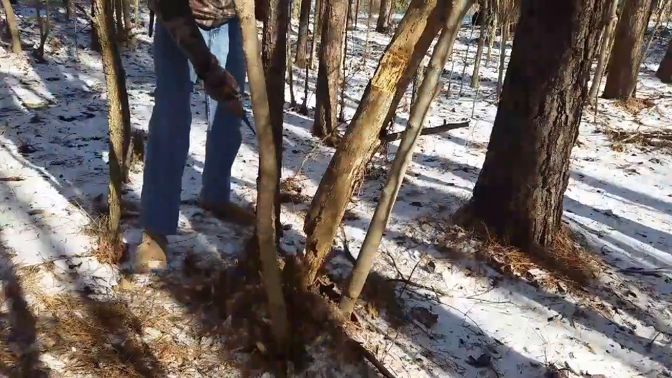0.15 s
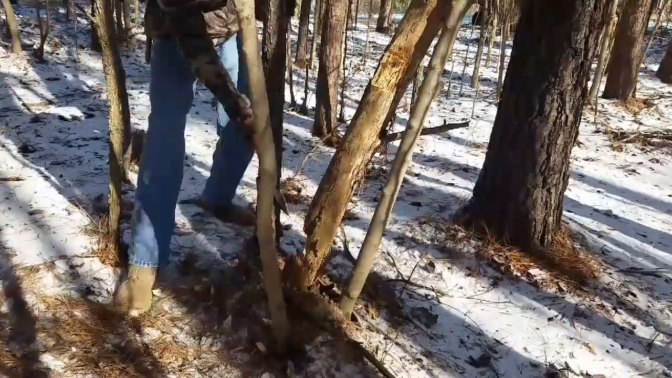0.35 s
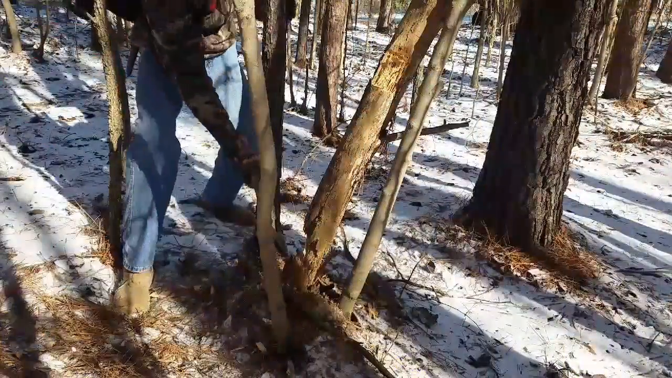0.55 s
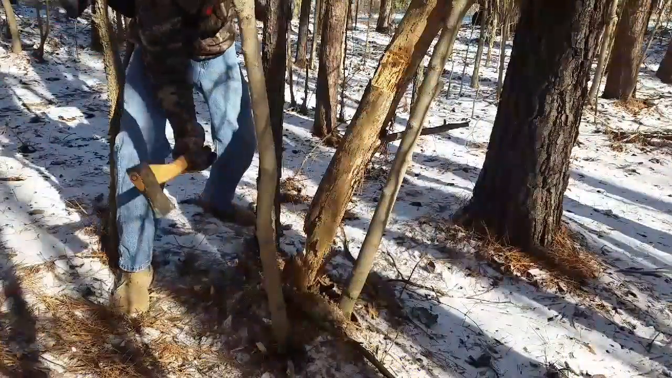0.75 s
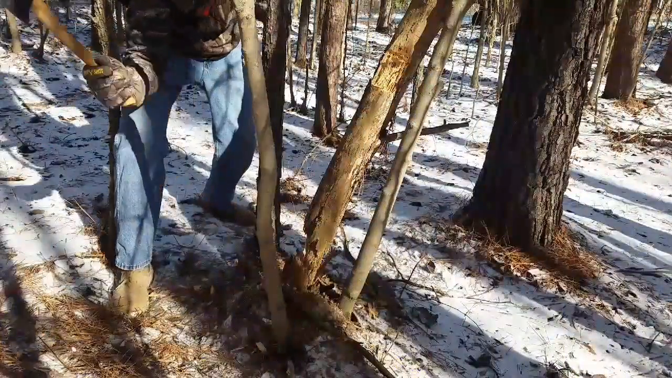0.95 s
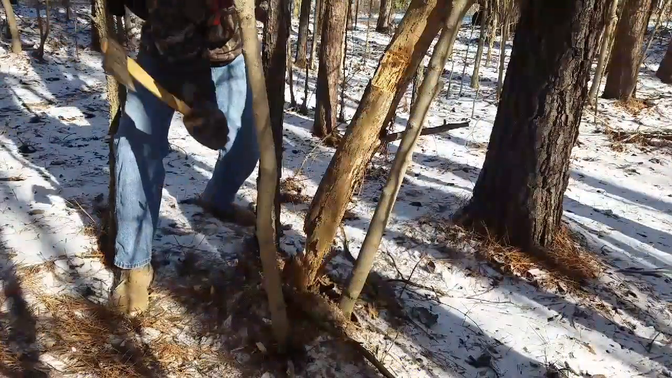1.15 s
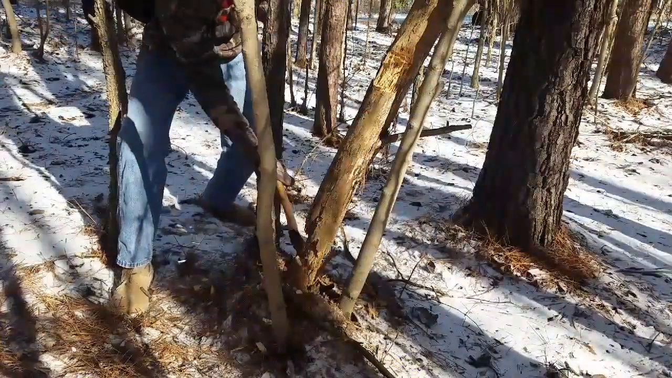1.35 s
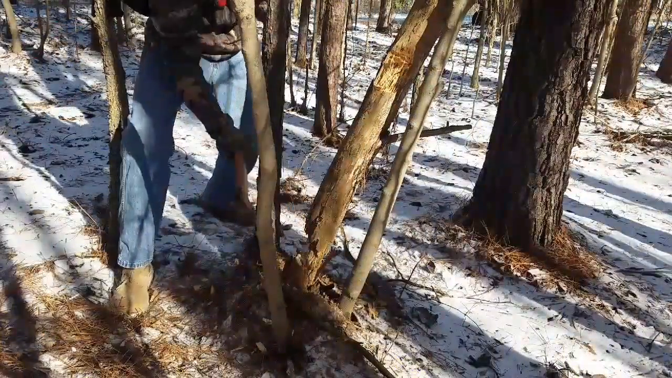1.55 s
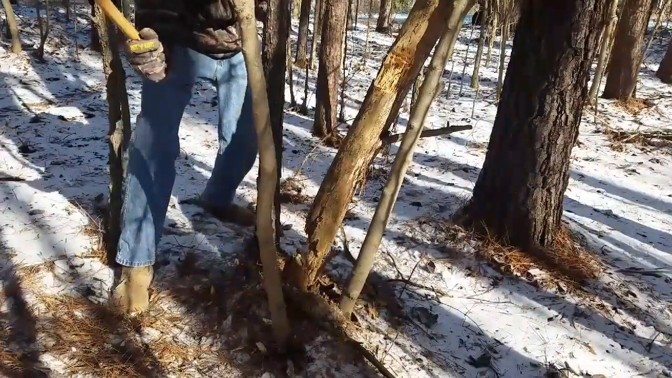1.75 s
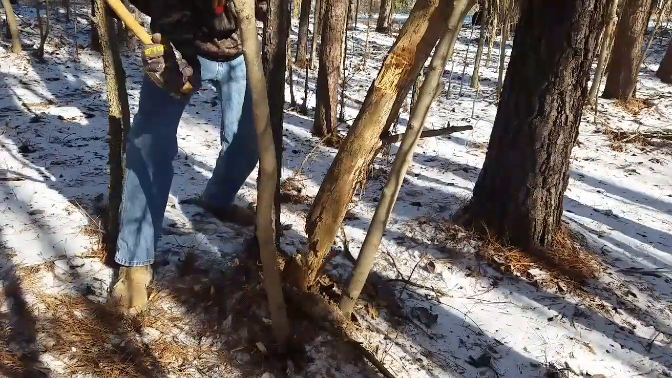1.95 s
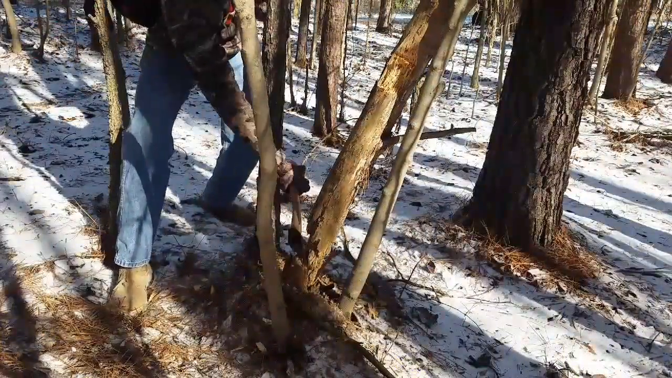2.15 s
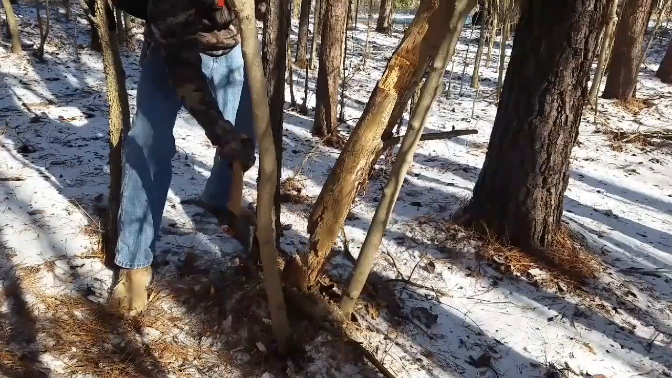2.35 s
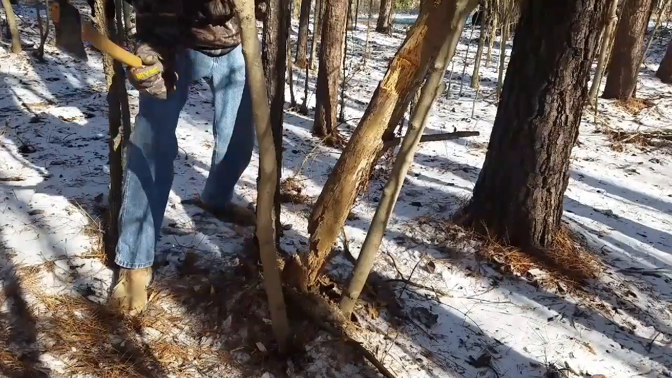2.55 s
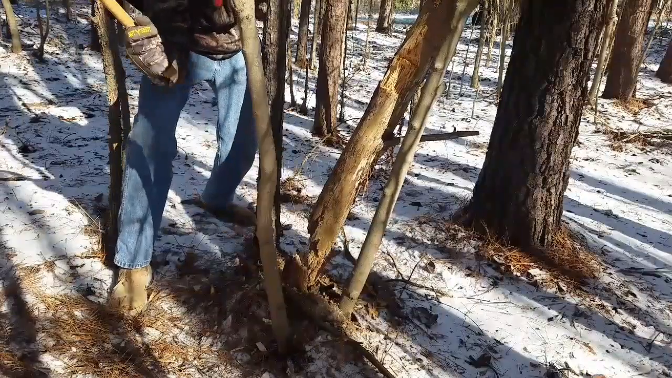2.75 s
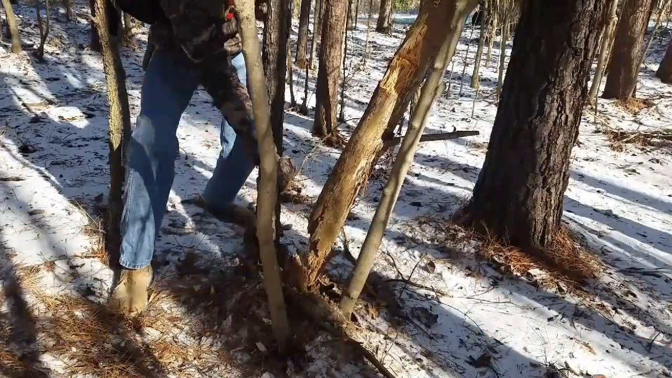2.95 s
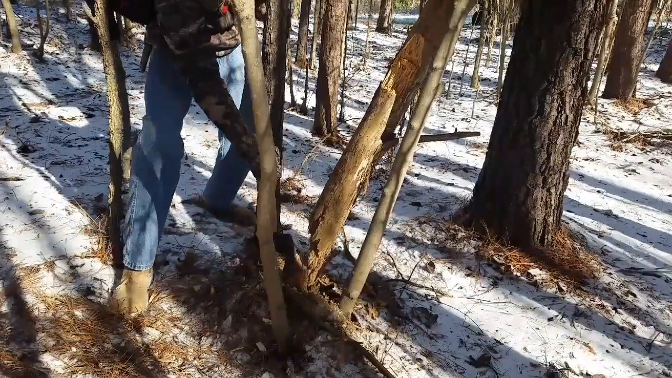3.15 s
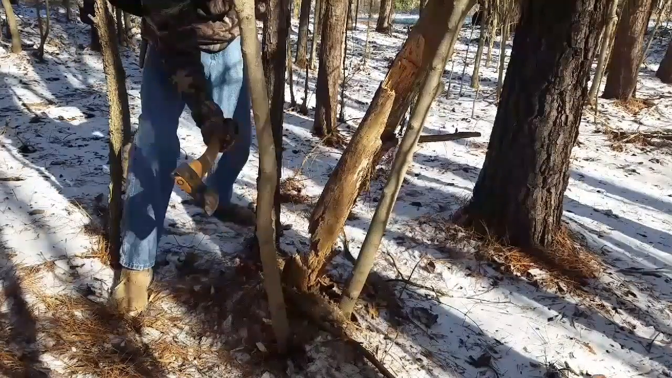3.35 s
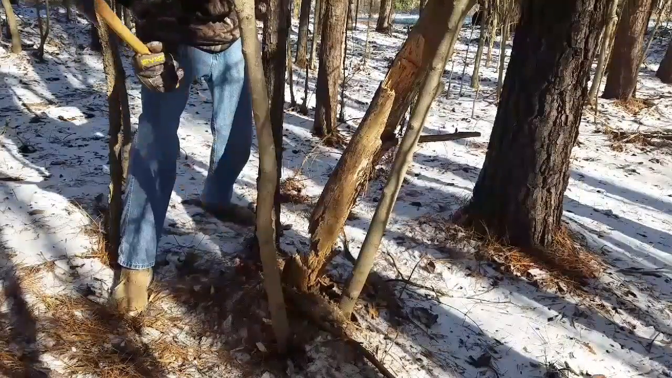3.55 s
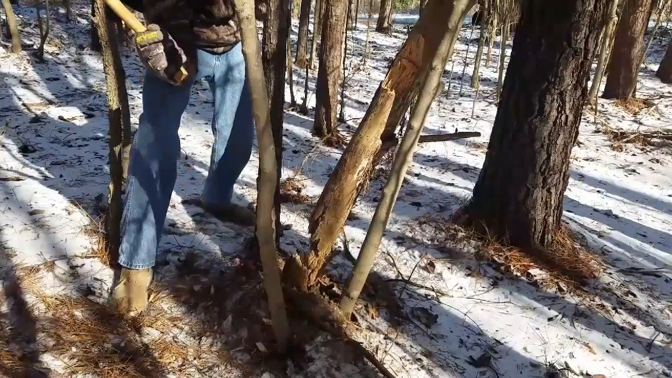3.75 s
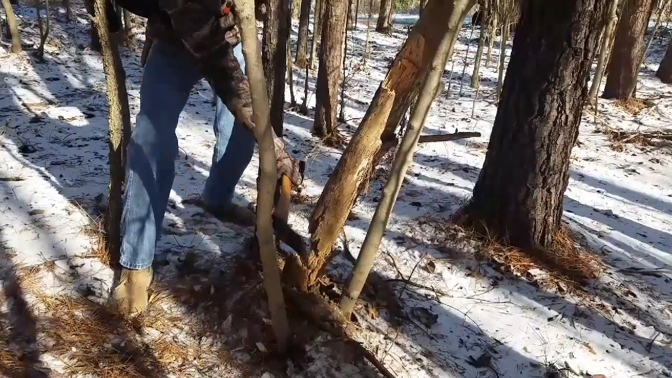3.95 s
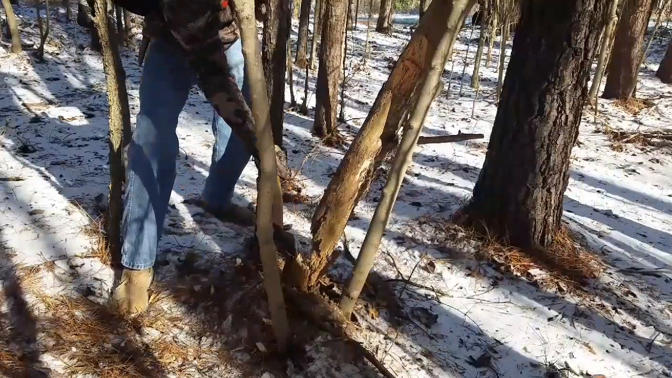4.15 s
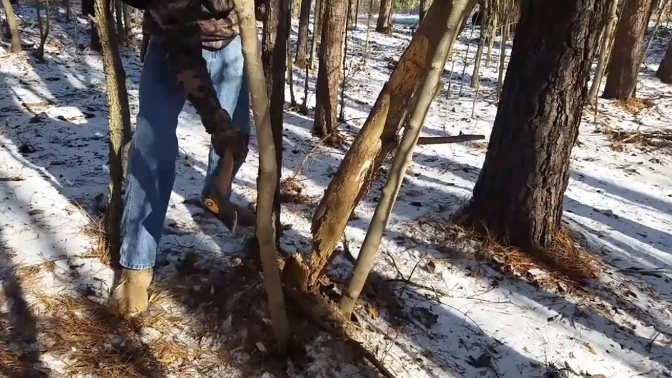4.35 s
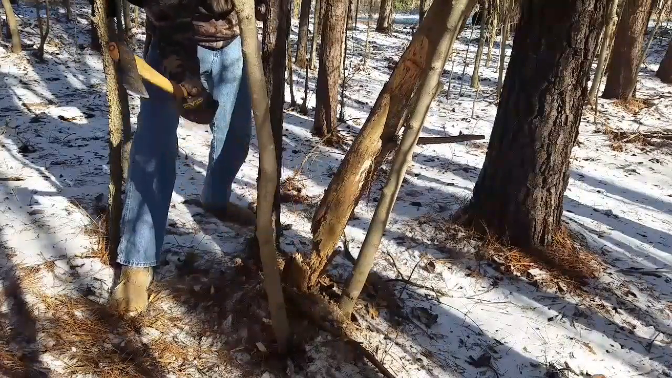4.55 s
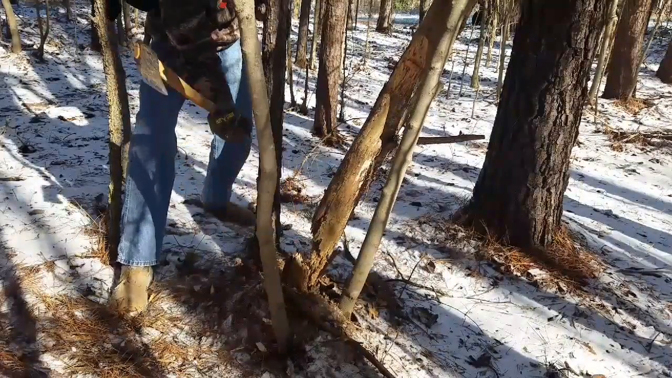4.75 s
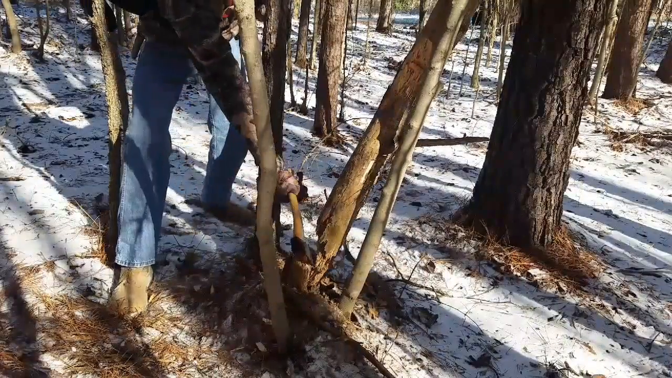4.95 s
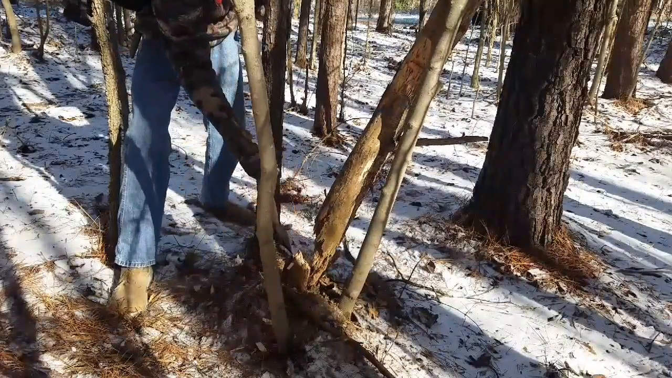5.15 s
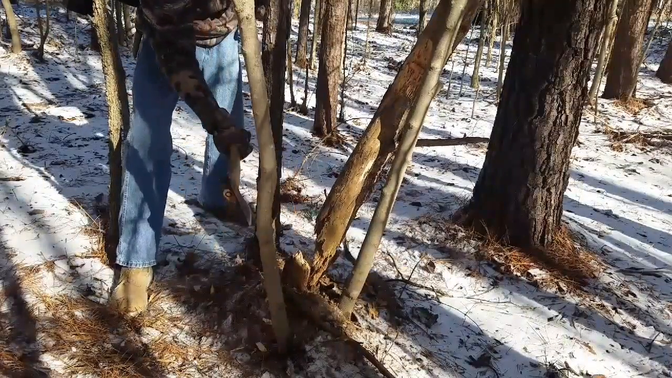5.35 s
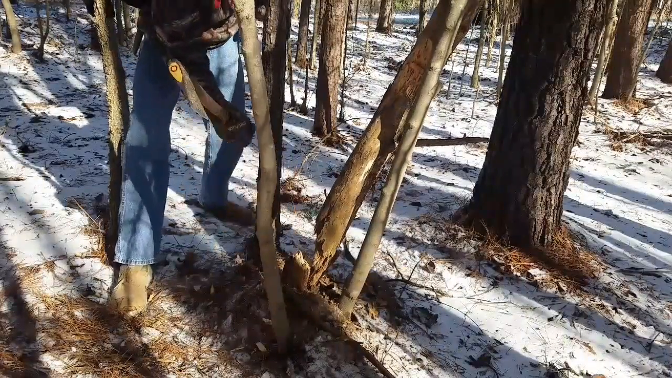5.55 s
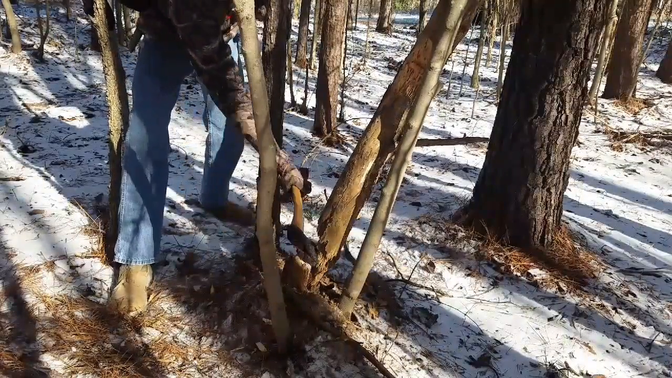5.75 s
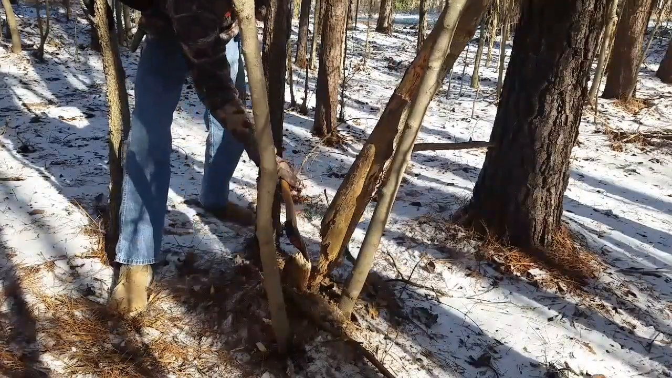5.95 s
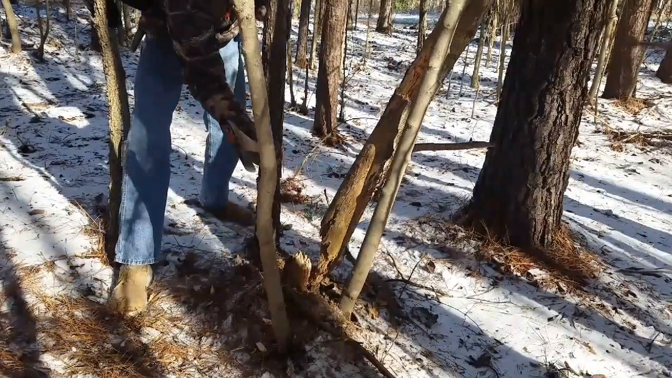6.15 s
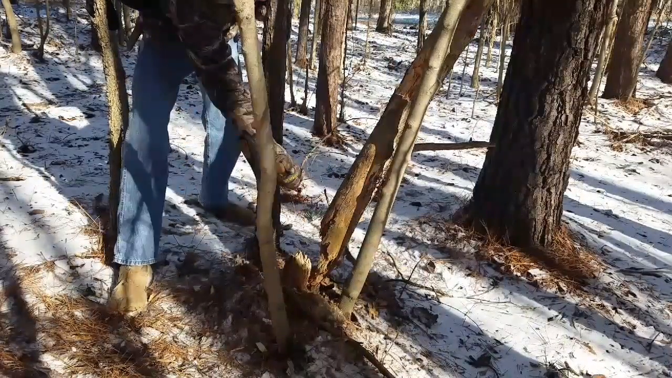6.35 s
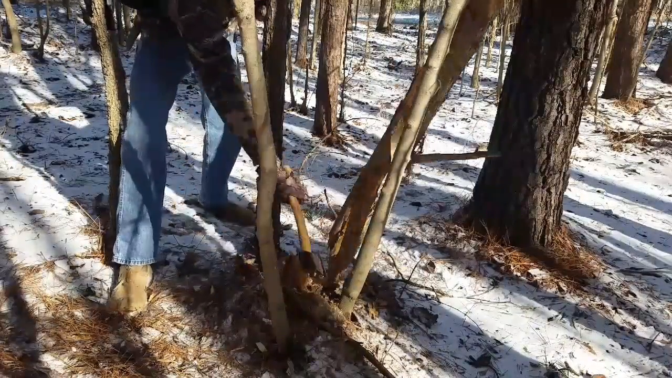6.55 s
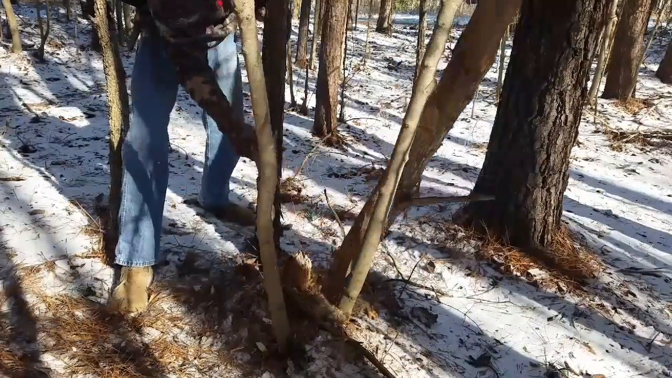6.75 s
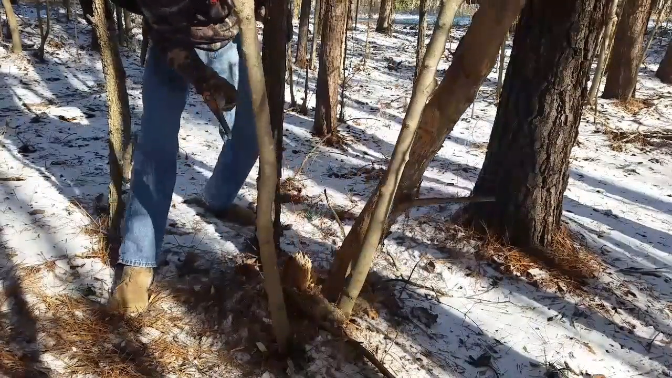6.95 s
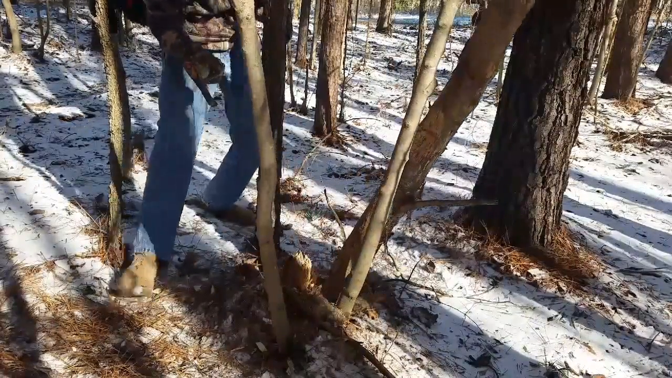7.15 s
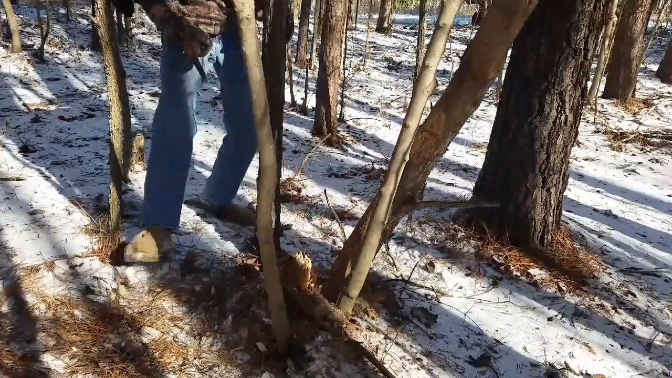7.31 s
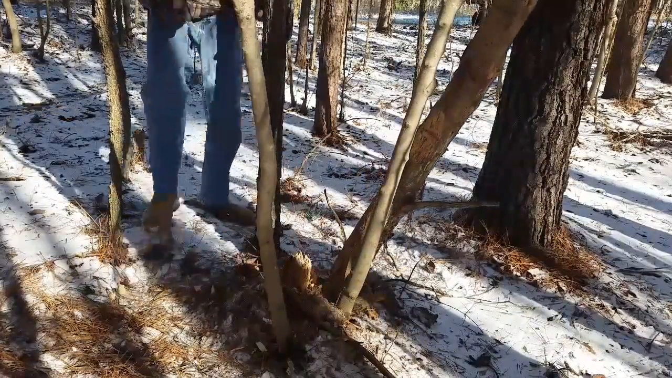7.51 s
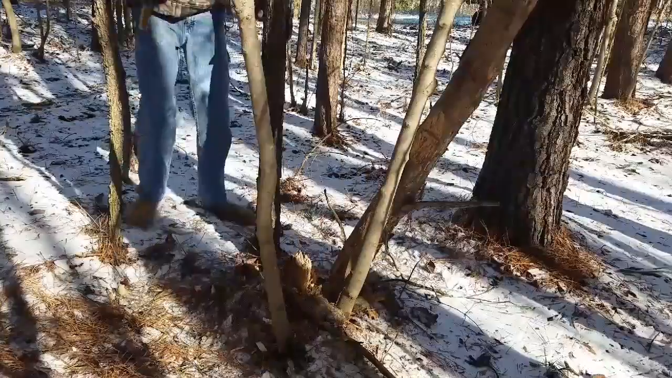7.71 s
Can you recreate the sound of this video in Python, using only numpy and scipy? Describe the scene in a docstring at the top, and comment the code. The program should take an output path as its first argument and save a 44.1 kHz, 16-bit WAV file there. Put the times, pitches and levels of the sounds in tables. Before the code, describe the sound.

Quiet snowy forest, close outdoor stereo pickup. Faint scuffs and twig ticks lead to seven loud, dry hatchet blows, each slightly different in pitch and brightness. The blade knocks briefly as it is prised free after the third. The final chop runs straight into several sharp fibre cracks as the trunk gives way; a dull bump, litter rustle and soft boot scuffs follow. Echoes scatter off trees.

```python
"""Felling a dead pine

In snowy woods a hatchet strikes seven times, then the stem breaks in a run of dry cracks.
Each chop is three impacts (edge bites, wedge jams, head rocks) that excite decaying modes of the trunk
and its notch, tear fibres as showers of clicks, and shake the ground as a low damped swell.
Boots, twigs and bumps are filtered grains; the trees scatter the wood, boots and ground into a long tail."""
import sys
import numpy as np
from scipy import signal
from scipy.fft import rfft, irfft, next_fast_len
from scipy.io import wavfile

SR = 44100
rng = np.random.default_rng(int(sys.argv[2]) if len(sys.argv) > 2 else 0)


def transcribe(signal):
    """Save signal, clipped to [-1, 1], as a 16-bit WAV file at the path in sys.argv[1]."""
    frames = np.atleast_2d(signal).T
    limited = np.clip(frames, -1, 1)
    pcm = np.round(limited * 32767).astype(np.int16)
    wavfile.write(sys.argv[1], SR, pcm)


N = 343098


def from_db(db):
    """Decibel law: a level in dB becomes an amplitude ratio."""
    return 10 ** (np.asarray(db) / 20)


def rms_one(x):
    """Power normalisation: the mean square becomes one."""
    return x / np.sqrt(np.mean(x ** 2) + 1e-20)


def unit_energy(x):
    """Energy normalisation: the squares of each channel sum to one."""
    return x / np.sqrt(np.sum(x ** 2, axis=-1, keepdims=True) + 1e-20)


def seconds(length):
    """Sampled time, from zero up to the length in seconds."""
    return np.arange(int(length * SR)) / SR


def fade(t, t60):
    """Exponential decay by 60 dB in t60 seconds."""
    return np.exp(-np.log(1000) * t / t60)


def add(out, start, sound):
    """Superposition: a sound is summed in from its start in seconds."""
    i = max(round(start * SR), 0)
    out[:, i:i + sound.shape[-1]] += sound[..., :N - i]


def colour(x, points):
    """Minimum-phase filtering: a causal response through (Hz, dB) points, by folding the cepstrum."""
    n = 2 * next_fast_len(x.shape[-1] // 2 + 1024)
    hz, db = np.transpose(points)
    bin_hz = np.arange(n // 2 + 1) * SR / n
    gain_db = np.interp(np.log(bin_hz + 1), np.log(hz), db)
    cepstrum = irfft(np.log(from_db(gain_db)))
    cepstrum[1:n // 2] *= 2
    cepstrum[n // 2 + 1:] = 0
    return irfft(rfft(x, n) * np.exp(rfft(cepstrum)))[..., :x.shape[-1]]


def grains(n, spread_db):
    """Granular noise: two unrelated streams of tiny clicks of uneven size."""
    size_db = spread_db * np.minimum(rng.exponential(1, (2, n)), 5)
    return rms_one(rng.standard_normal((2, n)) * from_db(size_db))


# Share of sound that differs between the ears. Each row: frequency in Hz, side gain in dB.
EAR_DIFFERENCE = [(100, -5), (300, -9), (650, -6), (1400, 0.5), (4000, 0), (14000, 0.5)]


def diffuse(pair):
    """Interaural coherence: the ears hear alike in the bass and differently in the treble."""
    side = colour(pair[1], EAR_DIFFERENCE)
    return rms_one(np.array([pair[0] + side, pair[0] - side]))


# Grainy crunch of packing snow. Each row: frequency in Hz, filter gain in dB.
CRUNCH_SPECTRUM = [(80, -8.5), (200, -0.5), (400, -0.5), (900, -3), (1800, -4.5), (3000, -16.5),
                   (8000, -40)]
# Hiss of snow crust and cloth. Each row: frequency in Hz, filter gain in dB.
HISS_SPECTRUM = [(800, -7.5), (2500, -1), (4500, 1), (7500, 2), (9500, -9), (14000, -4.5)]
# Boots scuff and clothes brush. Each row: start in seconds, length in seconds,
# crunch level in dB, hiss level in dB.
SCUFFS = [(-.02, 0.077, -52.5, -48.5), (0.25, 0.078, -49, -41), (0.305, 0.2, -49, -45),
          (0.514, 0.23, -58.5, -56.5), (0.781, 0.16, -57.5, -64), (0.828, 0.055, -51, -55),
          (1.815, 0.26, -64, -63), (5.758, 0.064, -52, -66), (5.813, 0.041, -60, -48),
          (7.361, 0.18, -59, -52), (7.755, .06, -48, -47.5)]


def boots(edge_s, left_db):
    """Granular friction: snow packs with a sparse crunch while its crust and the cloth hiss."""
    out, t = np.zeros((2, N)), np.arange(N) / SR
    slips = np.interp(t, np.linspace(0, N / SR, 550), rng.standard_normal(550))
    surge = from_db(2.0 * slips)
    sparse = grains(N, spread_db=2.5) * (rng.random(N) < .03)
    crunch = rms_one(colour(diffuse(sparse), CRUNCH_SPECTRUM) * surge)
    hiss = rms_one(colour(diffuse(grains(N, spread_db=4.0)), HISS_SPECTRUM) * surge)
    hiss = hiss * from_db([[left_db], [-left_db]])
    for start, length, crunch_db, hiss_db in SCUFFS:
        press = np.clip((t - start) / edge_s, 0, 1)
        release = np.exp(-np.clip((t - start - length) / edge_s + 1, 0, 20))
        out += press * release * (from_db(crunch_db) * crunch + from_db(hiss_db) * hiss)
    return out


# Effort of the shifting stance, joined by straight lines. Each row: time in seconds, level in dB.
STANCE = [(0, -59), (1.1, -67), (2.0, -62), (2.9, -59.5), (3.8, -65.5), (4.7, -74), (5.35, -54),
          (5.7, -59.5), (6.45, -56), (7.2, -52), (7.75, -65.5)]
# Colour of needles and twigs. Each row: frequency in Hz, filter gain in dB.
LITTER_SPECTRUM = [(100, -15), (350, 5.5), (900, -0.5), (2500, -5.5), (7500, -5.5), (9500, -12),
                   (14000, -7)]
TWIGS_PER_S, TWIG_SPREAD_DB = 55, 2.5
RUSTLE_DB = 2.0   # even rustle relative to the ticks


def litter(tick_t60):
    """Random impulses: tiny twigs tick over rustling needles as the weight moves from boot to boot."""
    sizes = rng.standard_normal(N) * from_db(TWIG_SPREAD_DB * np.minimum(rng.exponential(1, N), 3))
    clicks = sizes * (rng.random(N) < TWIGS_PER_S / SR)
    t = seconds(.03)
    tick = diffuse(grains(len(t), spread_db=6.0)) * fade(t, tick_t60)
    ticks = rms_one(signal.fftconvolve(clicks[None], tick, axes=-1)[:, :N])
    rustle = diffuse(grains(N, spread_db=-1.5))
    effort = from_db(np.interp(np.arange(N) / SR, *np.transpose(STANCE)))
    return effort * rms_one(colour(ticks + from_db(RUSTLE_DB) * rustle, LITTER_SPECTRUM))


# Colour of the still winter air. Each row: frequency in Hz, filter gain in dB.
AIR_SPECTRUM = [(25, -4), (80, -4), (150, -11), (400, -4), (900, -12), (2500, -20.5), (7500, -26),
                (9500, -29.5), (14000, -23)]


def winter_air(level_db):
    """Stationary noise: a steady, diffuse background with a falling spectrum."""
    noise = diffuse(rng.standard_normal((2, N)))
    return from_db(level_db) * rms_one(colour(noise, AIR_SPECTRUM))


# Early scattering by ground and nearby stems. Each row: frequency in Hz, gain in dB.
NEAR_SCATTER = [(100, -10), (400, -5), (1200, -9.5), (3000, -7.5), (8000, -4), (14000, -2)]
# Late scattering by farther trunks. Each row: frequency in Hz, gain in dB.
FAR_SCATTER = [(70, -10.5), (200, -22.5), (500, -15.5), (1000, -14.5), (2500, -12), (7000, -9.5),
               (14000, -7.5)]


def forest(x, near_t60, far_t60, treble_t60, deep_t60, deep_db, low_patchy_db, high_patchy_db):
    """Multiple scattering: near stems answer at once; farther echoes add in power to a grainy tail."""
    t = seconds(.25)
    near_rise = 1 - np.exp(-t / 0.00027)
    near = unit_energy(diffuse(grains(len(t), spread_db=4.5)) * fade(t, near_t60) * near_rise)
    out = signal.fftconvolve(x, colour(near, NEAR_SCATTER), axes=-1)[:, :N]
    t, edges = seconds(2), np.geomspace(60, 15000, 13)
    far_rise = 1 - np.exp(-t / 0.0092)
    echoes = [diffuse(grains(N, spread_db=3.5)) for _ in range(2)]   # alternate between bands
    far_hz, far_db = np.transpose(FAR_SCATTER)
    for k, band in enumerate(zip(edges, edges[1:])):
        sos = signal.butter(2, band, "band", fs=SR, output="sos")
        hz = np.sqrt(np.prod(band))
        t60 = np.interp(hz, [1000, 6000], [far_t60, treble_t60])
        tail = fade(t, t60) + from_db(deep_db) * fade(t, deep_t60)
        decay = unit_energy(tail * far_rise) ** 2
        power = signal.fftconvolve(np.mean(signal.sosfilt(sos, x) ** 2, axis=0), decay)[:N]
        # trunks stand in clumps, so the echoes come in patches
        clumps = np.interp(np.arange(N) / SR, np.linspace(0, N / SR, 500), rng.standard_normal(500))
        patchy_db = np.interp(hz, [1000, 4000], [low_patchy_db, high_patchy_db])
        gain = from_db(np.interp(np.log(hz), np.log(far_hz), far_db) + patchy_db * clumps)
        out += gain * np.sqrt(np.abs(power)) * rms_one(signal.sosfilt(sos, echoes[k % 2]))
    return out


# Colour of parting fibres. Each row: frequency in Hz, filter gain in dB.
TEAR_SPECTRUM = [(100, -19), (300, 7), (700, 11), (1500, 5), (3000, 1.5), (4600, -0.5), (6300, 1.5),
                 (7800, 0.5), (9500, -9), (14000, -3.5)]


def tearing(t, t60, first_db, spread):
    """Brittle fracture: a fibre bundle parts with a click and a fast-dying shower of smaller ones."""
    mid, side = unit_energy(grains(len(t), spread_db=5.0) * fade(t, t60))
    mid = unit_energy(mid + from_db(first_db) * (t == 0))
    side = colour(side, EAR_DIFFERENCE)
    return colour(unit_energy(np.array([mid + spread * side, mid - spread * side])), TEAR_SPECTRUM)


def fracture_colour(crack, db, body_db):
    """Spectral balance: sets the knock, body and top of a break; body_db is relative to the top."""
    return colour(crack, [(450, db + body_db - 7), (1500, db + body_db), (3000, db)])


# Fibres and twigs snap. Each row: start in seconds, gain in dB from 3000 Hz up (before the common gain),
# body at 1500 Hz in dB relative to that top.
SNAPS = [ (0.119, -48, -37), (0.726, -41.5, -47), (0.839, -34, -28), (0.848, -37.5, -3), (1.26, -45.5, -10),
         (1.312, -50, 1.5), (2.598, -38.5, -8), (3.390, -41.5, 3), (5.301, -43, -4), (5.0555, -23.5, 0),
         (6.328, -41, -3), (6.5299, -31.5, 5.5), (7.037, -40, -6), (7.346, -35.5, -9)]


def snaps(level_db):
    """Impulsive release: dry fibres break too briefly to ring the trunk."""
    out, t = np.zeros((2, N)), seconds(.05)
    for start, db, body_db in SNAPS:
        crack = tearing(t, t60=0.015, first_db=-5.5, spread=0.87)
        add(out, start, fracture_colour(crack, db, body_db))
    return from_db(level_db) * out


# Dull bumps of boots, handle and loose wood. Each row: start in seconds,
# energy level in dB (before the common gain), centre frequency in Hz.
BUMPS = [(0.294, -41.5, 910), (0.438, -47, 378), (0.655, -52, 845), (0.849, -47, 500), (1.041, -45.5, 300),
         (1.262, -51.5, 440), (2.447, -45, 1260), (2.679, -48, 680), (4.876, -58.5, 2360),
         (5.556, -42, 1140), (5.557, -48.5, 423), (5.628, -50, 1340), (5.689, -49, 2650),
         (5.863, -43, 4330), (6.096, -45, 2470), (6.87, -34.5, 1150), (7.070, -46, 1290),
         (7.253, -47.5, 650)]


def bumps(t60, level_db):
    """Damped contact: soft, slightly scraping touches, each around one broad resonance."""
    out, t = np.zeros((2, N)), seconds(.1)
    for start, db, hz in BUMPS:
        touch = diffuse(grains(len(t), spread_db=5.5)) * fade(t, t60)
        touch = colour(touch, [(hz / 4, -18), (hz, 0), (hz * 1.24, -6), (hz * 5, -40)])
        add(out, start, from_db(db + level_db) * unit_energy(touch))
    return out


# Heels press on the rooted ground. Each row: start in seconds, level in dB.
HEELS = [(1.155, -54), (1.72, -54), (1.885, -49.5)]
GROUND_LAG_S = 0.0012   # from the jam until the roots move


def thuds():
    """Impulse transfer: jams reach the roots after a short lag, and heels press too; rows of (s, dB)."""
    rows = [(start + sink_s + GROUND_LAG_S, shake_db) for start, _, sink_s, *_, shake_db in CHOPS]
    return rows + list(HEELS)


def ground(hz, swell_s, shake_db):
    """Damped oscillation: the root plate swells into a few slow cycles and the soil shudders with it."""
    out, t = np.zeros((2, N)), seconds(.3)
    swell = t / swell_s * np.exp(1 - t / swell_s)
    for start, db in thuds():
        noise = rng.standard_normal(len(t))
        soil = rms_one(colour(noise, [(35, -34), (70, 2.5), (140, -6.0), (260, -10.5), (900, -67.5)]))
        roots = np.sin(2 * np.pi * hz * t)
        add(out, start, from_db(db) * swell * (roots + from_db(shake_db) * soil))
    return out


# Hatchet blows. Each row: start in seconds, bite gain in dB at 1500 Hz, time until the wedge jams in seconds,
# jam gain in dB at 1500 Hz, knock at the lowest resonance in dB relative to the contact (first contact),
# splinter at 6000 Hz in dB relative to the bite, splinter at 6000 Hz in dB relative to the jam,
# low, middle and high notch resonance in Hz, treble thrown toward the trees in dB, ground shake in dB.
CHOPS = [ (1.3863, -8, 0.006, -7.5, -9, -5, -3.5, 321, 950, 2290, -6, -27.5),
         (2.227, -10.5, .0046, -8, -5, -6.5, -4.5, 425.6, 777, 1280, -0.5, -34.5),
         (3.1273, -7.5, 0.0027, -17, 0.5, -6, -2, 405, 663, 2930, -2, -34),
         (4.1134, -2.5, .0058, -12, -3, -18, 3, 625, 1004, 1237, -3, -38.5),
         (5.025, -12, .0073, -5, -7, -10.5, -13.5, 459, 824, 1260, 4, -41.5),
         (5.8999, -6, .0081, -24, 7, -11, -39, 420, 586, 923, 5.5, -43),
         (6.578, -12.5, .0058, -6.5, -4, -15.5, -6, 534, 595, 1100, -5.5, -34)]
# After the jam the head rocks once, weaker than the jam.
ROCK_S, ROCK_LOSS_DB, ROCK_SPLINTER_DB = 0.0065, 16.5, -11
DEPTH_KNOCK_DB = 9.5   # each contact lies deeper in the wood and knocks more


def contacts():
    """Successive impacts: bite, jam and rock as (s, knock dB, clack dB, splinter dB, notch Hz, thrown dB)."""
    rows = []
    for (start, bite_db, sink_s, jam_db, knock_db, bite_splinter_db, jam_splinter_db,
         *notch_hz, thrown_db, _) in CHOPS:
        bite = (start, bite_db, bite_splinter_db)
        jam = (start + sink_s, jam_db, jam_splinter_db)
        rock = (start + sink_s + ROCK_S, jam_db - ROCK_LOSS_DB, ROCK_SPLINTER_DB)
        for depth, (at, db, splinter_db) in enumerate([bite, jam, rock]):
            deep_knock_db = db + knock_db + depth * DEPTH_KNOCK_DB
            rows.append((at, deep_knock_db, db, db + splinter_db, notch_hz, thrown_db))
    return rows


# Trunk modes. Each row: frequency in Hz, level in dB (before random variation and the common gain),
# decay time t60 in seconds.
TRUNK_MODES = [(146.3, -22.5, 0.08), (300, -2, 0.036), (446.4, -10, 0.054), (650, -10, 0.036),
               (824, -7.5, 0.13), (1100, -12.5, 0.039), (1287, -8.5, 0.087), (1552, -1, 0.024),
               (1858, -8, .05), (2265, -4.5, 0.046), (2510, -12.5, 0.031), (2932, -1.5, .033)]
# Low, middle and high notch resonance: level in dB for a frequency of 1000 Hz, rising with frequency.
NOTCH_DB = [-7.5, -7.5, -12.5]
NOTCH_CYCLES = 19   # cycles until a notch resonance has fallen 60 dB
BASS_CUT_DB = -8   # an octave under the lowest resonance, relative to the knock


def chops(tear_db, tear_bass_db, ring_db, vary_db):
    """Modal excitation: contacts ring trunk and notch and tear fibres; gives direct and thrown sound."""
    direct, thrown, t = np.zeros((2, N)), np.zeros((2, N)), seconds(.2)
    hz, mode_db, t60 = np.transpose(TRUNK_MODES)[:, :, None]
    for start, knock_db, clack_db, splinter_db, notch_hz, thrown_db in contacts():
        strength = from_db(mode_db + vary_db * rng.standard_normal(hz.shape))
        # each mode radiates its own way, reaching the ears out of step
        lag = .00003 * rng.standard_normal((2, len(hz), 1))
        modes = strength * fade(t, t60) * np.cos(2 * np.pi * hz * (t - lag))
        wood = colour(np.sum(modes, axis=1), [(40, -9.0), (200, 1.0), (5000, 1.5), (12000, -5.5)])
        # the notch changes shape with every blow
        notch = np.zeros(len(t))
        for f, db in zip(notch_hz, NOTCH_DB):
            notch += from_db(db) * f / 1000 * fade(t, NOTCH_CYCLES / f) * np.sin(2 * np.pi * f * t)
        fibres = tearing(t, t60=0.031, first_db=-18.5, spread=0.67)
        fibres = colour(fibres, [(600, tear_bass_db), (2000, 0)])
        blow = from_db(tear_db) * fibres + from_db(ring_db) * wood + notch
        # the angle of the edge sets the balance of knock and splinter
        low_hz = notch_hz[0]
        blow = colour(blow, [(low_hz / 2, knock_db + BASS_CUT_DB), (low_hz, knock_db),
                             (1500, clack_db), (6000, splinter_db)])
        add(direct, start, blow)
        add(thrown, start, colour(blow, [(500, 0.0086), (6000, thrown_db)]))
    return direct, thrown


# The hatchet is prised out of the cut and knocks twice. Each row: start in seconds,
# gain in dB up to 600 Hz, treble from 3000 Hz up in dB relative to that.
PRISES = [(3.6281, -1.5, -3.5), (3.6395, -4, -5.5)]
# Resonances of the head and handle. Each row: frequency in Hz, quality factor Q, gain in dB.
HATCHET_MODES = [(456, 3.3, 3.5), (645, 5.3, 0.5), (2274, 4, 4), (4570, 5.5, -4.5), (7200, 2.4, -7)]


def prising(t60):
    """Stick-slip: the blade slips in the wood with a short rasp that rings its head and handle."""
    out, t = np.zeros((2, N)), seconds(.08)
    for start, db, treble_db in PRISES:
        rasp = unit_energy(diffuse(grains(len(t), spread_db=2.0)) * fade(t, t60))
        slip = unit_energy(rasp + (t == 0))
        knock = np.zeros((2, len(t)))
        for hz, q, gain_db in HATCHET_MODES:
            knock += from_db(gain_db) * signal.lfilter(*signal.iirpeak(hz, q, fs=SR), slip)
        add(out, start, colour(knock, [(600, db), (3000, db + treble_db)]))
    return out


# Strands of the hinge break as the stem leans over. Each row: start in seconds,
# gain in dB from 3000 Hz up (before the common gain), body at 1500 Hz in dB relative to that top,
# shower of small fibres in dB relative to the pulse.
CRACKS = [(6.6339, -14, -0.5, -0.5), (6.6958, -37, -8, -12), (6.706, -16.5, -10.5, -6.5),
          (6.7217, -33.5, -3.5, -19.5), (6.7442, -38, -6, -9), (6.7568, -32, -9, -18), (6.7745, -46, 8, 6),
          (6.7993, -19.5, -6.5, -9), (6.8775, -40.5, 1, 12.5)]


def cracks(level_db, ring_hz, ring_q, ring_db):
    """Sudden stress release: a strand parts in one hard pulse, its stub rings and small fibres follow."""
    out, t = np.zeros((2, N)), seconds(.05)
    for start, db, body_db, shower_db in CRACKS:
        pulse = colour(1.0 * (t == 0), TEAR_SPECTRUM)
        shower = tearing(t, t60=0.026, first_db=-26, spread=0.98)
        crack = pulse + from_db(shower_db) * shower
        stub = signal.lfilter(*signal.iirpeak(ring_hz, ring_q, fs=SR), crack)
        crack = from_db(ring_db) * stub - crack
        add(out, start, fracture_colour(crack, db, body_db))
    return from_db(level_db) * out


def scene():
    """Superposition: wood and steps sound among the trees, over still winter air."""
    blows, thrown = chops(tear_db=18.0, tear_bass_db=0.5, ring_db=-15.0, vary_db=2.5)
    wood = snaps(level_db=22.5) + bumps(t60=0.051, level_db=25.5) + prising(t60=0.017)
    wood += cracks(level_db=20.5, ring_hz=2900, ring_q=2.3, ring_db=10)
    near = wood + ground(hz=76.0, swell_s=0.013, shake_db=-2.5) + boots(edge_s=0.02, left_db=2.0)
    trees = forest(near + thrown, near_t60=0.15, far_t60=0.62, treble_t60=0.68, deep_t60=2.5,
                   deep_db=-28.0, low_patchy_db=2.5, high_patchy_db=3.0)
    return blows + near + trees + litter(tick_t60=0.0072) + winter_air(level_db=-66.5)


def record(dry):
    """Saturation and band-limiting: peaks are rounded and the top is cut above 14600 Hz."""
    low_pass = signal.ellip(10, .2, 70, 14600, fs=SR, output="sos")
    return signal.sosfilt(low_pass, np.tanh(dry))


dry = scene()
out = record(dry)
transcribe(out)
```